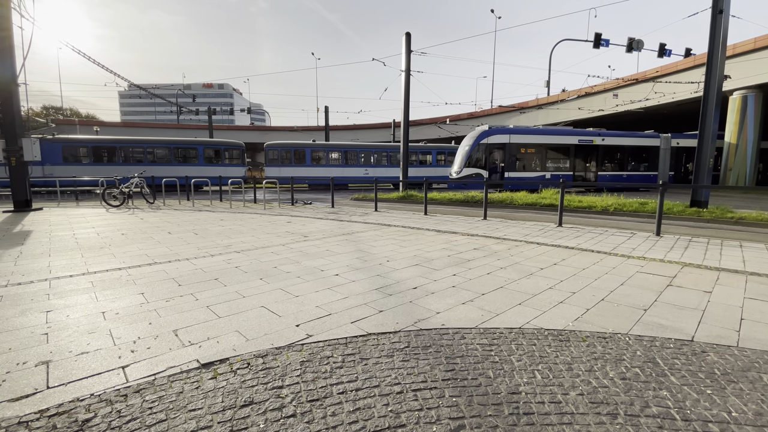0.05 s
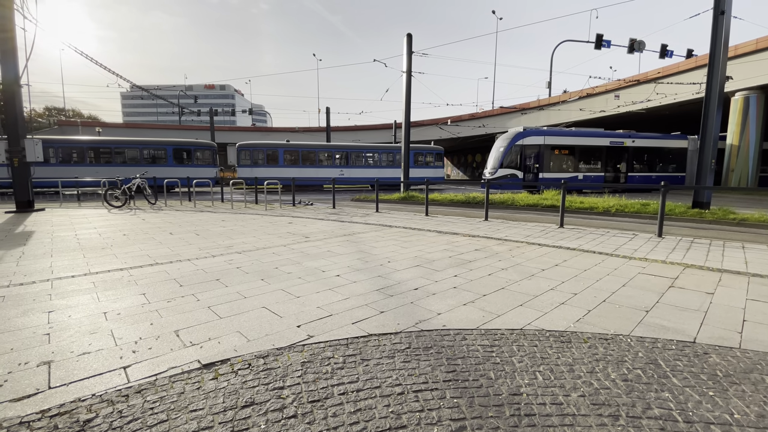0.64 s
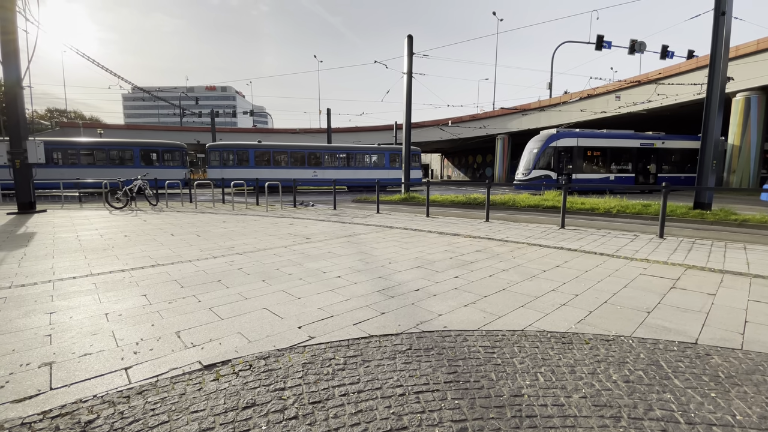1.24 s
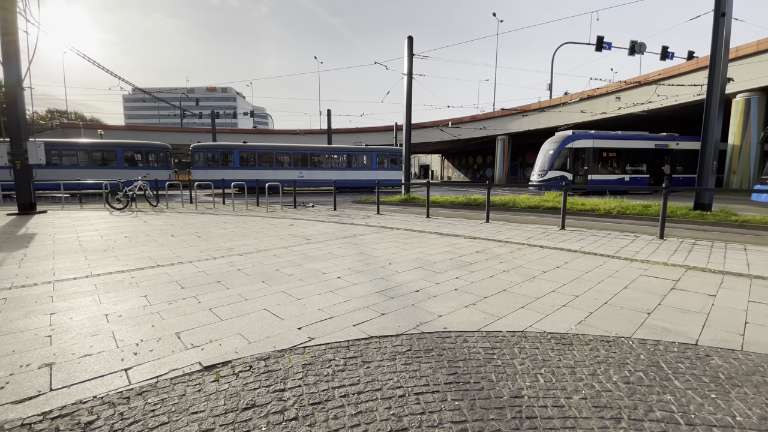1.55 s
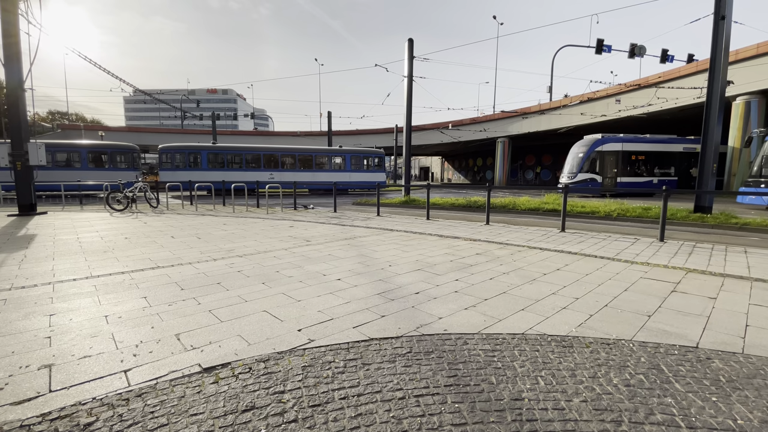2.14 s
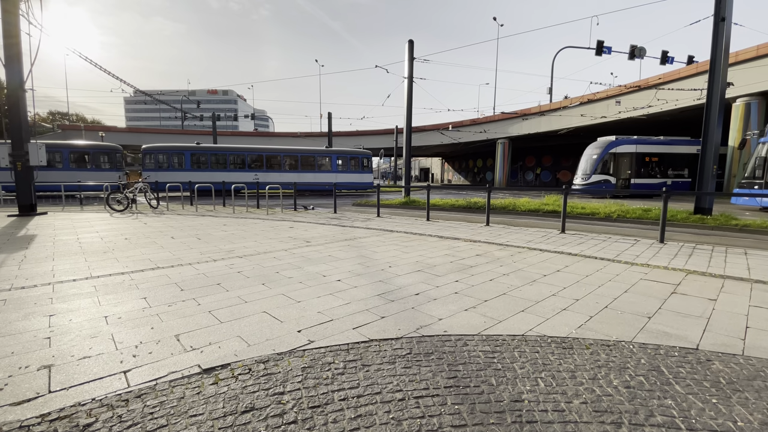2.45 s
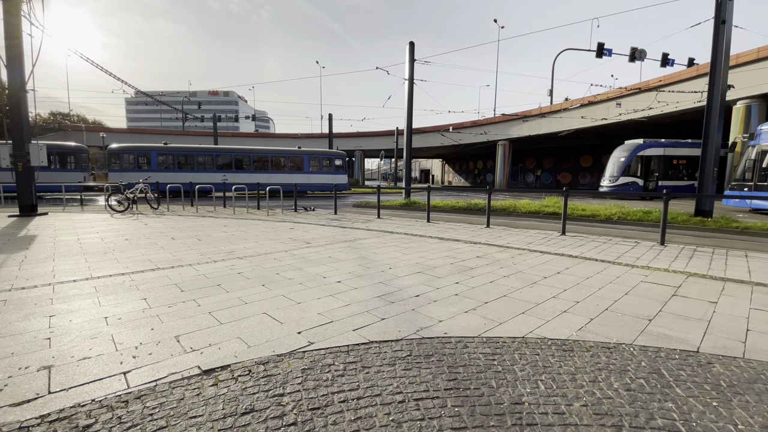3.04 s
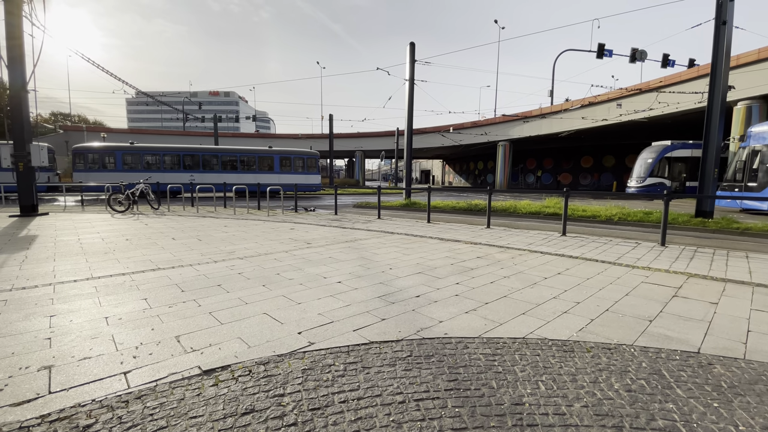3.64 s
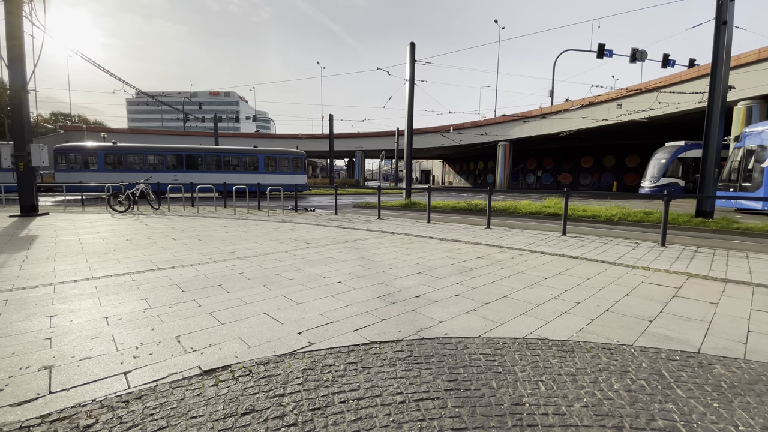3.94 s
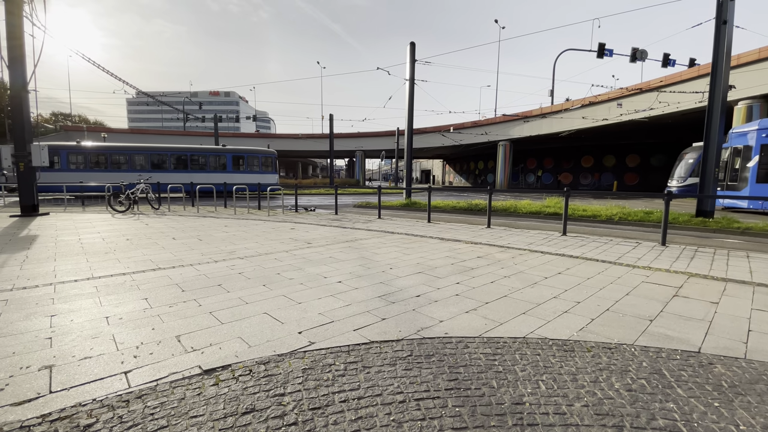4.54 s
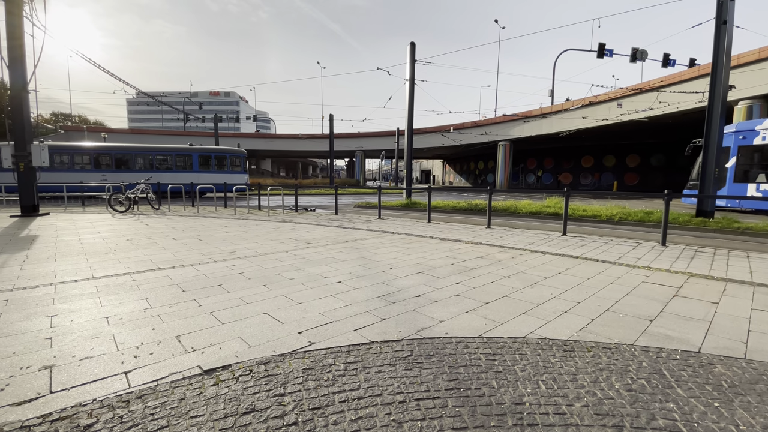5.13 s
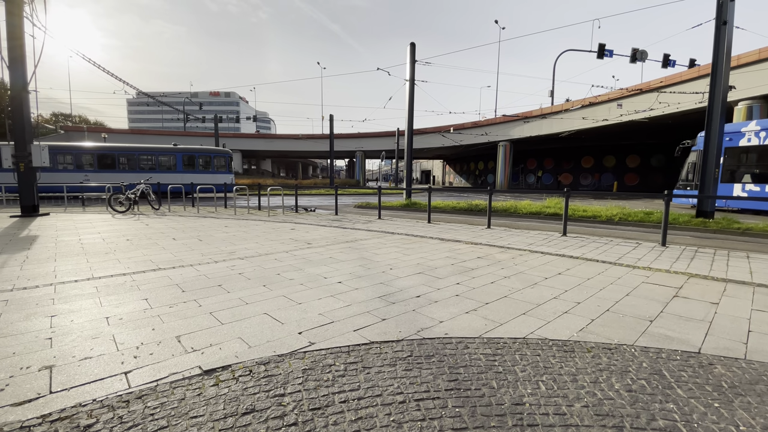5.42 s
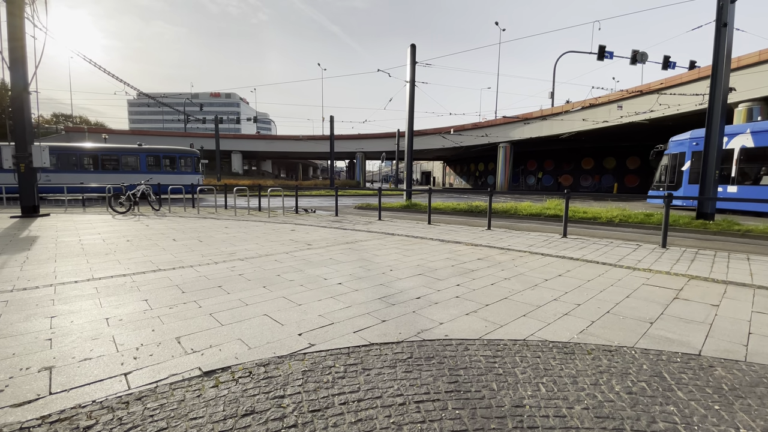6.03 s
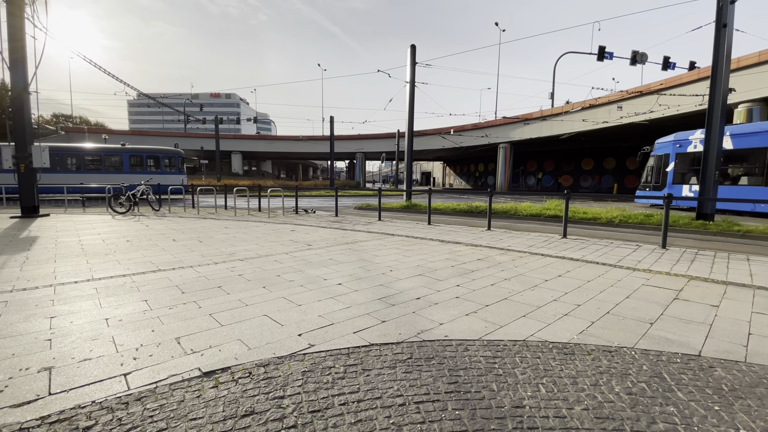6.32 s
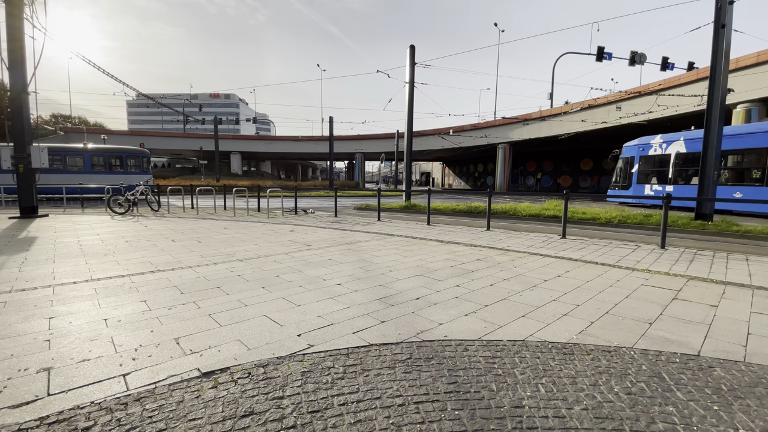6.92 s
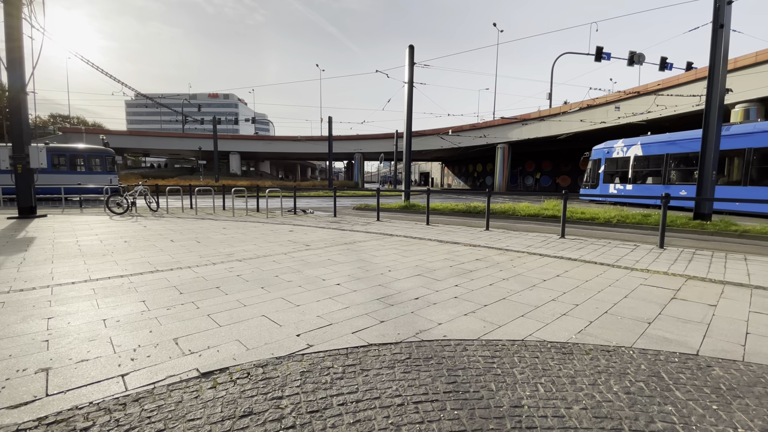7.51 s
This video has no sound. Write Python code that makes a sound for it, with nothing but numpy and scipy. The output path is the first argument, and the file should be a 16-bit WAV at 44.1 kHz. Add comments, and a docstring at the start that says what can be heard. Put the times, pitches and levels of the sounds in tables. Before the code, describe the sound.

A tram pulls away to the left through a street junction, its wheels rumbling, clacking over joints and clattering through crossings while loose gear knocks and the body booms. Halfway through, a second tram's drive whines faintly, and it draws in from the right with hollower clunks, short squeals and tapping fittings. Faint road traffic and a flyover's echo run throughout, heard on a phone from the pavement.

```python
"""Trams roll through a street junction beside a flyover, heard by a phone's two microphone ports on the
pavement. First one pulls away to the left: its wheels rumble, clack over joints and clatter through
crossings, a flange squeals briefly, loose gear knocks and the car body booms. From about 4 s the drive
of a second tram whines; by 6 s it draws in from the right with hollower clunks, and near the end come
short squeals and tapping fittings. Faint road traffic and the flyover's echo run throughout."""
import sys
import numpy as np
from scipy import signal
from scipy.fft import rfft, irfft, next_fast_len
from scipy.io import wavfile
from scipy.ndimage import uniform_filter1d

SR = 44100
rng = np.random.default_rng(int(sys.argv[2]) if len(sys.argv) > 2 else 0)


def dump_mix(stems):
    """Bounce the given channels to the path in sys.argv[1] as a 16-bit WAV at rate SR."""
    frames = np.atleast_2d(stems).T  # one column per channel
    limited = np.clip(frames, -1, 1)  # hard clip at full scale
    pcm = np.round(limited * 32767).astype(np.int16)
    wavfile.write(sys.argv[1], SR, pcm)


N = 342657
T = np.arange(N) / SR
SIZE = next_fast_len(N + SR)
FREQS = np.maximum(np.arange(SIZE // 2 + 1) * SR / SIZE, 1)
TOP_HZ = 11700

# rolling forces on plain rail: t/s, car body level/dB, rail level/dB, steel level/dB
ROLLING_LEVELS = [(0.0, -21, -28, -39.5), (0.48, -25.5, -29, -44.5), (0.72, -27.5, -36, -47),
                  (.96, -27, -32.5, -45), (1.15, -24, -31.5, -42.5), (1.45, -26.5, -35, -50),
                  (1.79, -26.5, -33, -45), (1.97, -29.5, -38, -49), (2.75, -30.5, -35.5, -52),
                  (3.14, -27.5, -35, -50), (3.75, -31.5, -37, -50.5), (4.22, -31.5, -37.5, -55),
                  (4.55, -30.5, -40, -51.5), (5.28, -28.5, -36, -55), (5.73, -27, -35, -49),
                  (7.36, -28.5, -33.5, -47), (7.77, -26, -31, -47)]
# modes of a struck wheel and the higher ones of its rim: f/Hz, t60/s, level/dB
WHEEL_MODES = [(606.7, 0.26, -6.5), (668, 0.19, -10.5), (725, 0.24, 0), (788, 0.11, -6), (883, 0.11, -5),
               (1199, 0.21, -8), (1398, 0.27, -13), (1690, 0.17, -12), (1895, 0.3, -14), (2400, 0.2, -18),
               (2620, 0.12, -18.5)]
RIM_MODES = [(1779, 0.056, 15.5), (2223, 0.12, 7), (2555, 0.04, 5.5), (2860, 0.048, 2), (3500, 0.018, 4.5),
             (5200, 0.01, 8), (5740, 0.028, 7), (6850, 0.077, -20), (9040, 0.0092, 2.5)]
# crossfade to the nearing tram on the right: t/s, share (0-1)
FROM_RIGHT = [(5.5, 0), (5.9, 1)]


def rolling():
    """Roughness excitation: uneven wheel and rail surfaces force car body, rail and steel rims."""
    body = undb(curve(ROLLING_LEVELS)) * grit(rough_db=2.0, rate=31)
    rail = undb(curve(ROLLING_LEVELS, axis=2)) * grit(rough_db=2.7, rate=54)
    steel = undb(curve(ROLLING_LEVELS, axis=3)) * grit(rough_db=2.3, rate=60)
    return np.array([body, rail, steel])


def rumble():
    """Forced vibration shakes track bed and car bodies; at heavy jolts a body booms on its springs."""
    levels = [(0, -20.5), (.5, -20.5), (.75, -24.5), (1.3, -24), (1.7, -24), (2, -27), (3.5, -27.5),
              (4.4, -26.5), (4.7, -25), (5.1, -25), (5.6, -25), (5.87, -27.5), (6.35, -24), (7.77, -22)]  # deep rumble: t/s, level/dB
    spectrum = [(15, -61), (25, -38), (38, -15), (50, 4), (63, 8.5), (88, 4.5), (125, -2), (180, -5.5),
                (300, -67.5)]  # its radiation: f/Hz, level/dB
    booms = [(.46, .04, 66, -19), (2.19, 0.04, 86, -21.5), (2.64, .035, 55.7, -21),
             (2.939, 0.023, 87, -19.5), (3.25, 0.019, 90, -16), (4.62, .035, 59, -29),
             (5.539, 0.02, 88, -15), (6.148, 0.012, 70, -14), (6.849, 0.011, 94.5, -12.5),
             (7.592, 0.024, 80.5, -9.5)]  # body resonances: t/s, swell/s, f/Hz, peak level/dB
    out = undb(curve(levels)) * through(rng.standard_normal((2, N)), colour(spectrum))
    t = T[:SR // 2]
    for (s, swell, hz, db), phase in zip(booms, rng.uniform(0, 2 * np.pi, len(booms))):
        envelope = (t / swell) ** 2 * np.exp(2 - 2 * t / swell)
        add(out[0], s, undb(db) * envelope * np.sin(2 * np.pi * hz * t + phase))
    return out


def crossings(groove_s=0.035, exit_share=.66, rebound_s=.06, trailing_db=-4.5):
    """Impact at gaps: each axle hits a crossing, runs its groove, hits the far joint and rebounds."""
    # bogies entering: t/s, axle lag/s, car body, rail and steel level/dB, second axle's rattle gain/dB
    bogies = [(.275, 0.58, -22.5, -35.5, -39, -2), (1.555, 0.55, -29.5, -38.5, -45.5, 4),
              (2.613, 0.6, -27.5, -27.5, -37, -.5), (4.587, 0.59, -30, -28.5, -35.5, 1.5),
              (6.565, .565, -47, -35.5, -47, 5.5), (7.63, .565, -29, -25.5, -34.5, 0)]
    # blows on car body, rail and steel, relative to the axle's rail level
    entry_db, exit_db, rebound_db = (10.5, -10, -14), (9, 2, -12.5), (4, 1.5, -13.5)
    blows, grooves = [], []
    for s, lag, body_db, rail_db, steel_db, second_db in bogies:
        for enters, db, rattle_db in (s, rail_db, 0), (s + lag, rail_db + trailing_db, second_db):
            leaves = enters + exit_share * lag
            blows.append((enters, *np.add(db, entry_db)))
            blows.append((leaves, *np.add(db, exit_db)))
            blows.append((leaves + rebound_s, *np.add(db, rebound_db)))
            grooves.append((enters + groove_s, *np.add(rattle_db, (body_db, rail_db, steel_db))))
    return blows, grooves


def track_faults(bumps_per_s=3, spread_db=1, bump_db=(-1.5, -12.5, -25)):
    """Impact at irregularities: lone rail joints, extra cracks at the crossings' far joints and the knocks just
    before them, and random bumps that scale with the rolling level."""
    joints = [(.197, -30, -35, -36.5), (0.256, -17, -35, -55), (0.408, -9.5, -39, -37.5),
              (.526, -15, -29, -35), (.742, -31, -33, -43), (.862, -19.5, -30, -42), (1.184, -12, -42, -47),
              (1.629, -12, -52, -56), (1.736, -14, -39, -38), (2.378, -21.5, -29, -48),
              (2.467, -29, -31, -56), (2.972, -23, -34, -41), (3.008, -38, -38, -34),
              (3.909, -27, -29.5, -45), (4.964, -29, -32, -36), (4.982, -36, -44, -39),
              (5.179, -35, -51, -38), (5.556, -28, -29, -41), (5.622, -30, -29, -35),
              (5.647, -19, -31, -52), (5.975, -30, -33, -54), (6.011, -28, -29, -56),
              (6.151, -15.5, -37, -54), (6.337, -15.5, -36, -39.5), (6.852, -15.5, -28, -36.5),
              (7.036, -21, -28, -59), (7.059, -22, -25, -48), (7.071, -32, -34, -39.5),
              (7.393, -26, -26, -43), (7.552, -17, -29, -51)]  # blows at joints and crossings: t/s, car body, rail and steel level/dB
    draws, drone_db = rng.standard_normal((80, 2)), curve(ROLLING_LEVELS)
    times = np.cumsum(np.exp(.5 * draws[:, 0])) / bumps_per_s
    bumps = [(s, *np.add(drone_db[int(s * SR)] - spread_db * size, bump_db))
             for s, size in zip(times, draws[:, 1]) if s < T[-1]]
    return joints + bumps


def impacts(hits, chatter_t60=(0.32, 0.32, 0.15), chatter_db=(-5.5, -3.0, -2.5)):
    """Impulse excitation: a short pulse pushes car body and rail, then all three forces chatter."""
    blows = np.zeros((3, 2, N))
    pulse = .7 * np.hanning(24)
    for s, body_db, rail_db, _ in hits:
        add(blows[0, 0], s, undb(body_db) * pulse)
        add(blows[1, 0], s, undb(rail_db) * pulse)
    decays = undb(chatter_db)[:, None] * [burst(0, 0.0022, t60) for t60 in chatter_t60]
    return blows + swells(hits, decays) * np.array([grit(rough_db=1.0, rate=160) for _ in range(3)])


def rattles(grooves, hits, hold_s=(0.068, 0.063, 0.031), loose_db=(-11, -10, -7)):
    """Intermittent contact: flanges rattle along the grooves, and loose parts after every blow."""
    groove = swells(grooves, [burst(0, rise=0.027, t60=0.66, hold=hold) for hold in hold_s])
    loose = swells(hits, undb(loose_db)[:, None] * burst(0, rise=0.024, t60=0.66))
    return np.hypot(groove, loose) * np.array([grit(rough_db=1.5, rate=140) for _ in range(3)])


def radiation(roll, jolts):
    """Source and filter: each part colours the force on it; only jolts excite wheel and rim modes."""
    # radiated spectra: f/Hz, level/dB
    car_body = [(25, -18), (50, -21), (100, -4), (145, -2.5), (215, 0.5), (300, -3), (390, -8.5),
                (480, -16.5), (800, -25), (1600, -77)]
    struck_rail = [(200, -16.5), (400, -2), (520, -4.5), (640, 0), (740, -2), (900, -2), (1300, -4.5),
                   (1600, -10.5), (2000, -19.5), (2700, -16), (4500, -36), (9000, -75)]
    rolled_rail = [(200, -14.5), (400, -5.5), (520, -7), (640, 0.5), (750, -0.5), (900, -3.5), (1100, -9.5),
                   (1300, -11.5), (1600, -19.5), (2000, -22.5), (2700, -32.5), (4500, -29.5), (9000, -66)]
    hollow_gear = [(180, -21.5), (330, 5.5), (450, 0), (560, 1.5), (740, 2.5), (950, -2.5), (1300, -7),
                   (1650, -14), (2000, -18), (2700, -29.5), (4500, -25), (9000, -64)]  # running gear of the nearing tram
    steel_rims = [(600, -6), (1500, 5.5), (2300, 1.5), (3500, 4.5), (5200, -0.5), (7000, 1), (9000, -3.5),
                  (10500, -7), (12000, -16)]
    body, rail, steel = roll + jolts  # each force has two unrelated rows
    near = curve(FROM_RIGHT)
    leaving = 1 - near
    out = through(body * undb(-3.0 * near), colour(car_body))
    out += through(jolts[1] * leaving, colour(struck_rail))
    out += through(roll[1] * leaving, colour(rolled_rail))
    out += undb(-0.5) * through(rail * near, colour(hollow_gear))
    out += through(steel, colour(steel_rims))
    # the ringing leaves the wheels in other directions than the blow, so the two rows swap
    out += undb(-4.0) * through(jolts[2, ::-1], ring(RIM_MODES))
    return out + undb(-8.0) * through(jolts[1, ::-1] * leaving, ring(WHEEL_MODES))


def struck_wheels(hits, clunk_db=-0.5, drum_db=-5.5):
    """Free vibration: the leaving tram's wheels ring and its body drums; the nearing one's gear clunks."""
    # modes of car body and running gear: f/Hz, t60/s, level/dB
    body_modes = [(209, 0.38, -7), (265, 0.077, -4), (360, 0.14, -5.5)]
    gear_modes = [(347.6, 0.21, -4), (447.6, 0.28, 3), (538, 0.13, 3.5), (703, 0.069, -1),
                  (1328, 0.15, -3.5), (1680, 0.093, -29)]
    out, near = np.zeros(N), curve(FROM_RIGHT)
    for s, body_db, rail_db, _ in hits:
        if near[int(s * SR)] > .5:
            add(out, s, undb(rail_db + clunk_db) * strike(gear_modes, detune=0.064))
        else:
            add(out, s, undb(rail_db) * strike(WHEEL_MODES, detune=0.023))
            add(out, s, undb(body_db + drum_db) * strike(body_modes, detune=0.029))
    return out


def groove_clanks(grooves, first_s=.018, gap_s=.03, fade_db=-1.54, wheel_db=-1.0, rim_db=-10.0, count=5):
    """Repeated impact: a flange knocks from side to side in the groove, ringing wheel and rim."""
    out = np.zeros(N)
    for s, _, rail_db, steel_db in grooves:
        for k, late in enumerate(rng.uniform(0, .5, count)):
            at = s + first_s + gap_s * (k + late)
            add(out, at, undb(rail_db + wheel_db + fade_db * k) * strike(WHEEL_MODES, detune=0.022))
            add(out, at, undb(steel_db + rim_db + fade_db * k) * strike(RIM_MODES, detune=0.053))
    return out


def steel_part(hz, t60, buzz=0.38, buzz_cycles=5):
    """Amplitude modulation: a struck part buzzes against its seat as its inharmonic modes ring."""
    ratios = [(.82, 1, -10.5), (1.002, 1, 0), (1.07, 0.84, -11.5), (1.24, 1, -19), (1.8, 0.42, -26),
              (2.56, .5, -26)]  # modes: frequency ratio, t60 ratio, level/dB
    modes = [(min(hz * multiple, TOP_HZ), t60 * share, db) for multiple, share, db in ratios]
    tone = strike(modes, detune=0.015)
    flutter = uniform_filter1d(rng.standard_normal(len(tone)), max(int(buzz_cycles * SR / hz), 1))
    return tone * (1 + buzz * flutter / flutter.std())


def fittings(taps_per_s=16, tap_hz=1350, spread_octaves=.17, spread_db=2):
    """Impact through free play: jolted gear knocks, struck wheels clang and car bodies thud, and light fittings
    keep tapping on rough track."""
    knocks = [(.199, 1740, 0.12, -30), (.203, 756, .08, -27), (.257, 727, 0.049, -15),
              (0.348, 985, .06, -19), (.526, 680, 0.088, -18), (.743, 1530, .07, -28),
              (0.864, 3140, 0.054, -38), (.863, 730, 0.082, -20.5), (.955, 737, 0.12, -24),
              (1.025, 713, 0.22, -23.5), (1.185, 742, 0.26, -25.5), (1.633, 207, .16, -18),
              (1.741, 212, 0.19, -19.5), (2.467, 1860, 0.039, -31), (2.622, 358, 0.11, -22),
              (2.622, 658, 0.17, -19.5), (2.673, 716, 0.24, -19.5), (2.698, 634, .22, -20.5),
              (2.712, 834, 0.13, -24), (2.722, 1666, 0.24, -32), (2.971, 1190, 0.068, -26),
              (3.002, 344, 0.12, -15), (3.002, 594, 0.11, -18.5), (3.007, 3590, .06, -29.5),
              (3.012, 880, .1, -23), (3.036, 754, 0.24, -18.5), (3.070, 593, .09, -25),
              (3.310, 990, 0.099, -18), (3.312, 640, 0.058, -24), (3.352, 1944, 0.18, -34),
              (3.360, 1120, .1, -22), (3.375, 2550, 0.29, -41), (3.592, 337, 0.18, -20.5),
              (3.595, 740, .08, -27), (4.586, 280, 0.066, -20), (4.587, 710, 0.1, -32),
              (4.665, 1690, 0.2, -32), (4.668, 612, 0.24, -23), (4.70, 731, 0.28, -24.5),
              (4.745, 2400, .3, -38), (4.976, 317, 0.073, -18), (4.981, 3700, 0.044, -26.5),
              (5.035, 736, 0.24, -23.5), (5.055, 640, 0.064, -20.5), (5.258, 792, 0.14, -22.5),
              (5.280, 710, 0.26, -25), (5.291, 1690, 0.18, -35), (5.325, 2620, .3, -38),
              (5.551, 1730, 0.04, -24), (5.563, 814, 0.08, -18), (5.578, 694, .08, -23),
              (6.011, 674, 0.08, -20), (6.146, 487, 0.28, -25), (6.29, 870, 0.1, -24),
              (6.4, 1340, .05, -29), (6.857, 330, 0.074, -15.5), (7.035, 2300, 0.038, -36),
              (7.071, 1297, 0.1, -15.5), (7.397, 386, 0.15, -18.5), (7.553, 1560, .08, -30.5),
              (7.626, 467, 0.075, -17)]  # struck steel: loose gear, ringing wheels and car-body thuds: t/s, f/Hz, t60/s, level/dB
    rough_track = [(7.123, 7.7, -41)]  # spells of tapping: start t/s, end t/s, level/dB
    out = np.zeros(N)
    for s, hz, t60, db in knocks:
        add(out, s, undb(db) * steel_part(hz, t60))
    for start, end, db in rough_track:
        for k, (late, pitch, size) in enumerate(rng.standard_normal((30, 3))):
            s = start + (k + np.tanh(late) / 2) / taps_per_s
            tap = steel_part(tap_hz * 2 ** (spread_octaves * pitch), t60=.07)
            if s < end:
                add(out, s, undb(db + spread_db * size) * tap)
    return out


def flange_squeals(flutter_db=5.5):
    """Stick-slip friction: a flange on the rail head sounds one rim mode in a fluttering scrape."""
    squeals = [(0.55, 0.13, 4600, -45.5, .008), (0.55, 0.19, 6160, -48, .007), (6.43, 0.07, 4600, -50, .02),
               (7.68, .11, 6560, -40, .015)]  # t/s, length/s, f/Hz, level/dB, relative pitch spread
    out = np.zeros(N)
    for s, length, hz, db, jitter in squeals:
        arch = np.sqrt(np.abs(np.sin(np.pi * np.clip((T - s) / length, 0, 1))))
        level = undb(db + flutter_db * walk(110))
        pitch = hz * (1 + jitter * walk(900))
        out += arch * level * np.sin(2 * np.pi * np.cumsum(pitch) / SR)
    return out


def drive_whine(start_s=3.85, rise_s=1, hold_s=1.6, release_s=1.9, level_db=-52.3):
    """Narrow-band noise: the nearing tram's drive whines, wavering as it swells, holds and fades."""
    bands = [(3604, 380, 1), (4450, 600, -22), (6700, 450, -15), (7600, 700, -15)]  # bands of the whine: f/Hz, width/Hz, level/dB
    envelope = np.interp(T, np.cumsum([start_s, rise_s, hold_s, release_s]), [0, 1, 1, 0])
    waver_db = 1.5 * walk(9)
    gain = sum(undb(db) / np.sqrt(width) / (1 + ((FREQS - hz) / (0.39 * width)) ** 2)
               for hz, width, db in bands)
    whine = irfft(rfft(rng.standard_normal((2, N)), SIZE) * gain, SIZE)[:, :N]
    return undb(level_db + waver_db) * envelope * whine / whine.std()


def traffic(level_db=-43.5, swell_db=4.5):
    """Incoherent sources: tyres on the flyover merge into a faint, slowly swelling wash."""
    # f/Hz, level/dB
    spectrum = [(300, -27), (700, -9.5), (1100, 7.5), (1900, -0.5), (2700, -14), (5000, -42.5)]
    level = undb(level_db + swell_db * walk(1.37))
    return level * through(rng.standard_normal((2, N)), colour(spectrum))


def flyover(x, t60=0.99, wet_db=-13, delay_s=0.031):
    """Diffuse reflection: the concrete overhead adds a late echo."""
    tail = (rng.standard_normal((2, N)) * burst(delay_s, 0.026, t60))[:, :SR]
    return x + undb(wet_db) * through(x, unit(tail))


def microphone_ports(x):
    """Partial coherence: row 0 reaches both ports with a phase between them, row 1 only the right."""
    # f/Hz, left minus right level/dB, coherence (0-1), left's lead/rad from ahead, and from the right
    pair = [(60, 1.5, .98, .05, -.08), (200, 2.2, .92, .15, -.22), (330, 1.3, .85, .45, -.5),
            (440, -.5, .6, .8, -.85), (540, 4, .3, 2.6, -1.4), (700, 10.5, .35, 1.4, -2),
            (900, 4, .65, 2.1, -2.9), (1100, 1.8, .68, 3.5, -2.7), (1400, 2, .72, 3.8, -2.4),
            (1750, 2.3, .75, 4.7, -1.5), (2250, 6, .4, 6.8, .5), (3000, 7, .35, 9, 2.4),
            (5500, 9, .15, 12, 5.8), (7000, 3, .35, 12.6, 6.3), (8200, -1.5, .5, 14.8, 8.4),
            (9200, -.5, .4, 13.8, 7.5), (10100, 0, .9, 15.7, 9.4), (11600, .5, .9, 12.8, 6.5)]
    shared, apart = rfft(x, SIZE)
    tilt, coherence = undb(by_hz(pair)), by_hz(pair, axis=2)
    scale = np.sqrt(2 / (1 + tilt ** 2))
    left = irfft(scale * tilt * shared, SIZE)[:N]
    right = scale * (coherence * shared + np.sqrt(1 - coherence ** 2) * apart)
    ahead = irfft(right * np.exp(-1j * by_hz(pair, axis=3)), SIZE)[:N]
    beside = irfft(right * np.exp(-1j * by_hz(pair, axis=4)), SIZE)[:N]
    share = curve(FROM_RIGHT)
    return np.array([left, (1 - share) * ahead + share * beside])


def undb(db):
    """Amplitude ratio of a level."""
    return 10 ** (np.asarray(db) / 20)


def curve(rows, axis=1):
    """Linear interpolation of a time table's column at every sample."""
    rows = np.array(rows)
    return np.interp(T, rows[:, 0], rows[:, axis])


def by_hz(rows, axis=1):
    """Interpolation of a table's column over log frequency at every bin."""
    rows = np.array(rows)
    return np.interp(np.log(FREQS), np.log(rows[:, 0]), rows[:, axis])


def unit(x):
    """Normalisation to an energy of 1."""
    return x / np.sqrt(np.sum(x ** 2, axis=-1, keepdims=True))


def add(out, s, x):
    """Superposition of the short sound x on out at time s."""
    span = out[int(s * SR):][:len(x)]
    span += x[:len(span)]


def through(x, response):
    """Convolution, cut to the length of the scene."""
    return irfft(rfft(x, SIZE) * rfft(response, SIZE), SIZE)[..., :N]


def colour(points):
    """Minimum-phase response with the given spectral shape, from its folded cepstrum."""
    cepstrum = irfft(np.log(undb(by_hz(points))), SIZE)
    cepstrum[1:SIZE // 2] *= 2
    cepstrum[SIZE // 2 + 1:] = 0
    return unit(irfft(np.exp(rfft(cepstrum)), SIZE)[:SR // 2])


def damped_sine(t, hz, t60):
    """Free vibration of one mode, falling 60 dB in t60 seconds."""
    return np.sin(2 * np.pi * hz * t) * np.exp(-np.log(1000) * t / t60)


def ring(modes):
    """Impulse response of damped modes whose levels set their relative energies."""
    return unit(sum(undb(db) * unit(damped_sine(T[:SR // 2], hz, t60)) for hz, t60, db in modes))


def strike(modes, detune):
    """Modal sum for one blow, each mode randomly a little off its pitch."""
    t = T[:int(SR * max(t60 for _, t60, _ in modes))]
    return sum(undb(db) * damped_sine(t, hz * (1 + detune * offset), t60)
               for (hz, t60, db), offset in zip(modes, rng.standard_normal(len(modes))))


def walk(rate):
    """Random modulation: values held 1 / rate seconds and smoothed twice; spread 1."""
    hold = max(int(SR / rate), 1)
    steps = np.repeat(rng.standard_normal(N // hold + 1), hold)
    smooth = uniform_filter1d(uniform_filter1d(steps, hold), hold)[:N]
    return smooth / smooth.std()


def grit(rough_db, rate):
    """Contact noise in small random bursts, shared by two unrelated rows."""
    x = rng.standard_normal((2, N)) * undb(rough_db * walk(rate))
    return x / x.std()


def burst(start, rise, t60, hold=0):
    """Exponential decay after a linear climb to 1 and a hold; times in seconds."""
    age = T - start
    return np.clip(age / rise, 0, 1) * np.exp(-np.log(1000) * np.maximum(age - rise - hold, 0) / t60)


def swells(events, shapes):
    """Addition of powers: each event (t/s, three levels/dB) starts an envelope on each force."""
    power, shapes = np.zeros((3, N)), np.array(shapes)[:, :SR] ** 2
    for s, *db in events:
        span = power[:, int(s * SR):][:, :SR]
        span += undb(db)[:, None] ** 2 * shapes[:, :span.shape[1]]
    return np.sqrt(power)[:, None]


def scene():
    """Superposition: trams and traffic add, echo under the flyover and reach the two ports."""
    blows, grooves = crossings()
    hits = [hit for hit in blows + track_faults() if hit[0] < T[-1] - .01]
    jolts = impacts(hits) + rattles(grooves, hits)
    out = radiation(rolling(), jolts) + rumble() + drive_whine() + traffic()
    out[0] += flange_squeals() + struck_wheels(hits) + groove_clanks(grooves) + fittings()
    return microphone_ports(flyover(out))


def record(dry, low_hz=30):
    """Band limiting: the deepest bass is thinned, and the phone cuts the top."""
    thin = signal.sosfilt(signal.butter(2, low_hz, "highpass", fs=SR, output="sos"), dry)
    return signal.sosfilt(signal.ellip(10, .2, 80, TOP_HZ, fs=SR, output="sos"), thin)


dry = scene()
out = record(dry)
dump_mix(out)
```